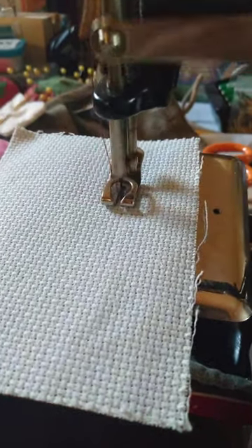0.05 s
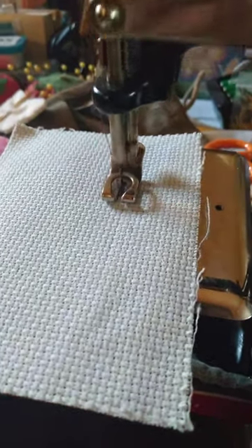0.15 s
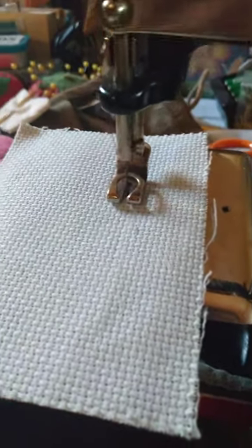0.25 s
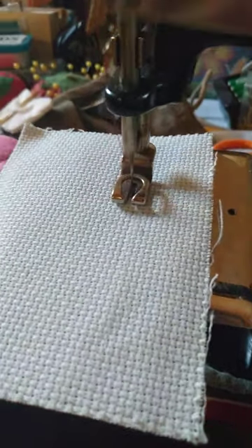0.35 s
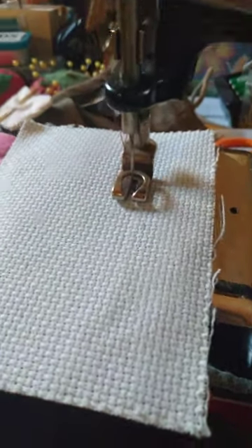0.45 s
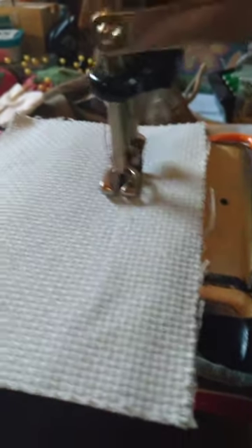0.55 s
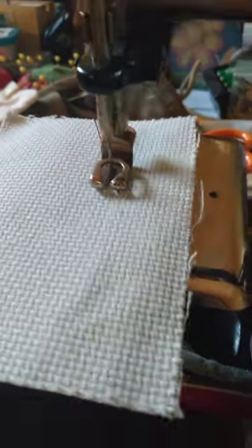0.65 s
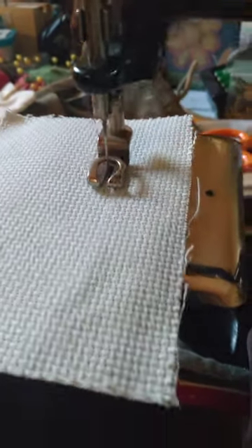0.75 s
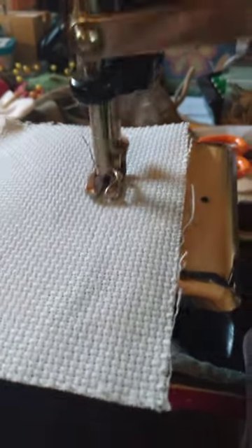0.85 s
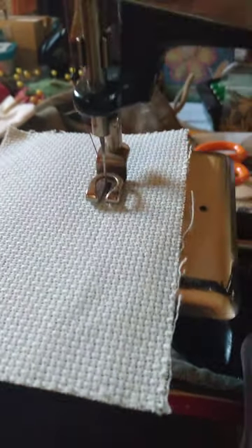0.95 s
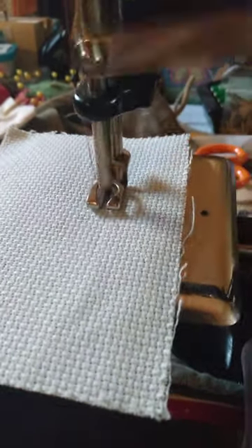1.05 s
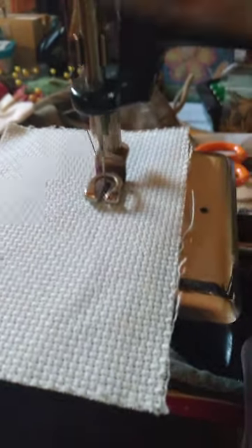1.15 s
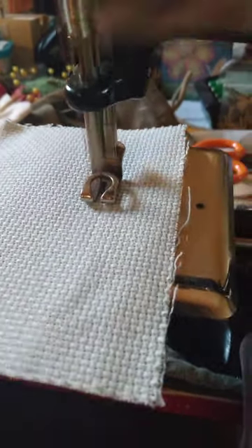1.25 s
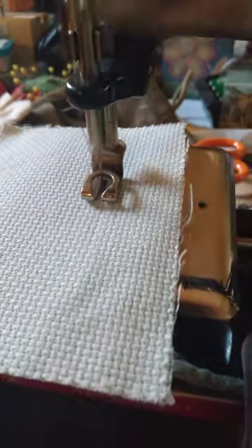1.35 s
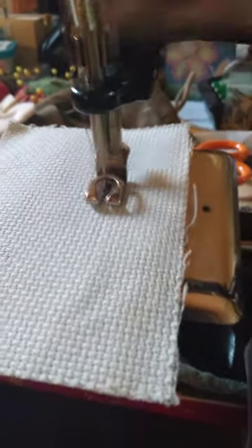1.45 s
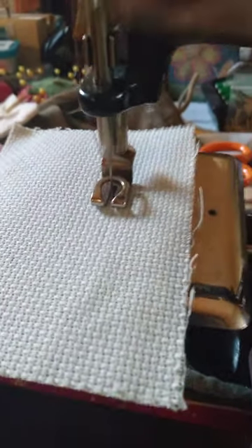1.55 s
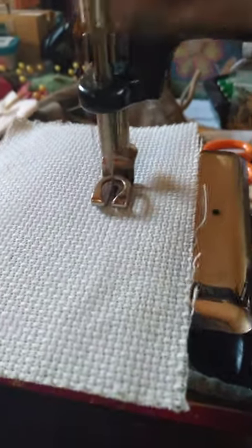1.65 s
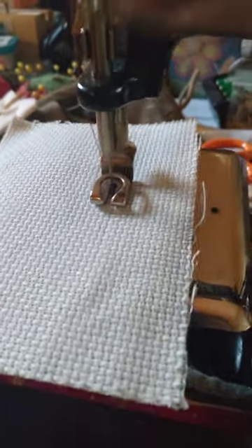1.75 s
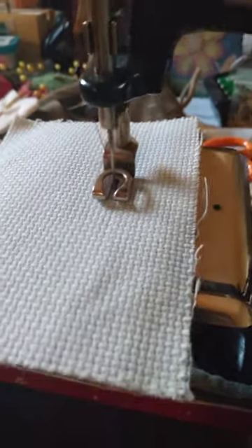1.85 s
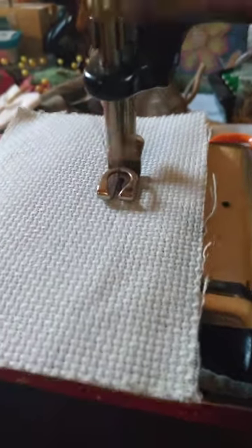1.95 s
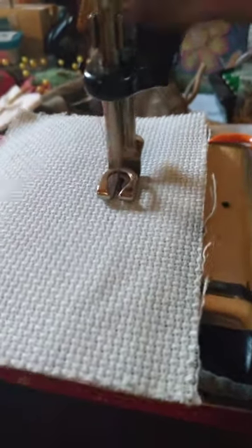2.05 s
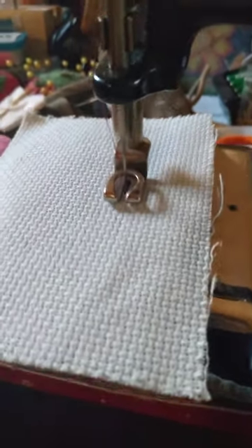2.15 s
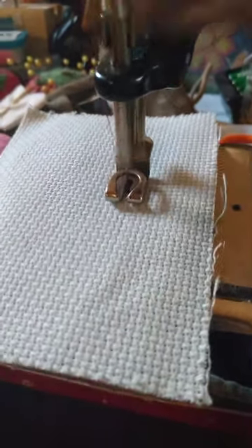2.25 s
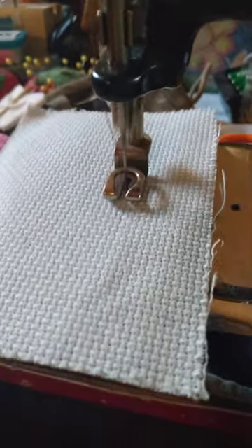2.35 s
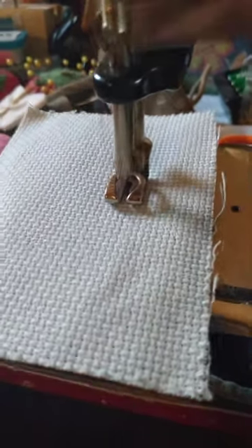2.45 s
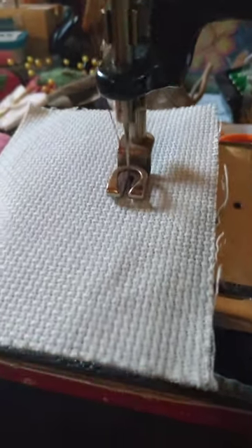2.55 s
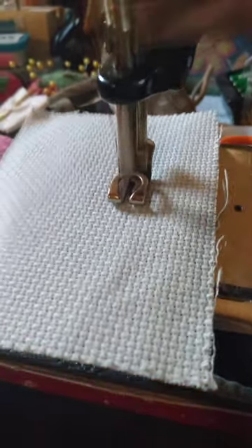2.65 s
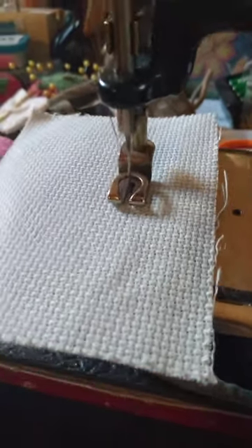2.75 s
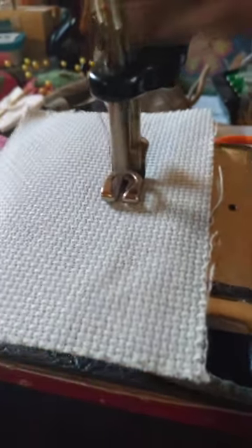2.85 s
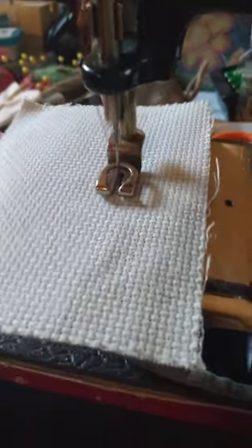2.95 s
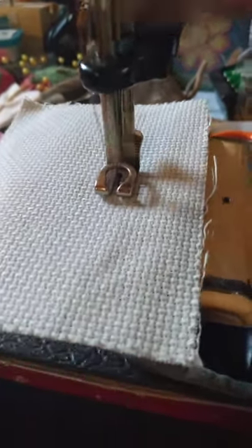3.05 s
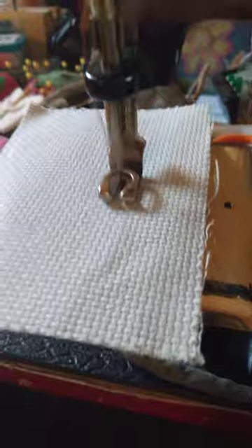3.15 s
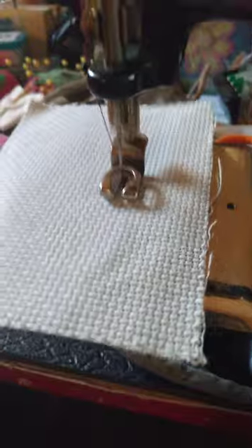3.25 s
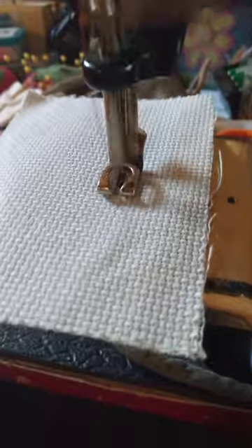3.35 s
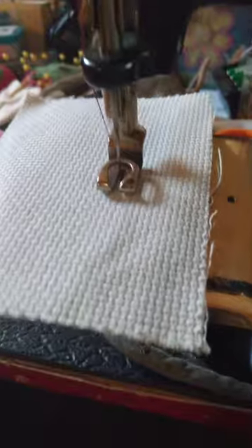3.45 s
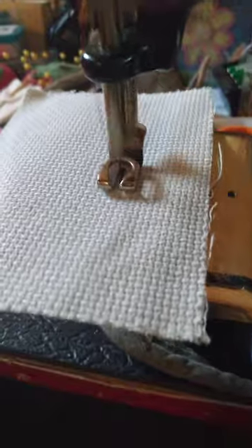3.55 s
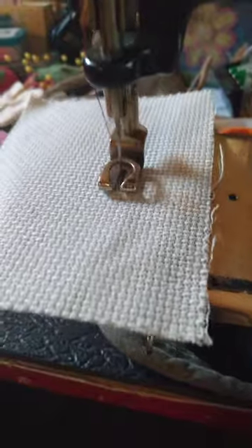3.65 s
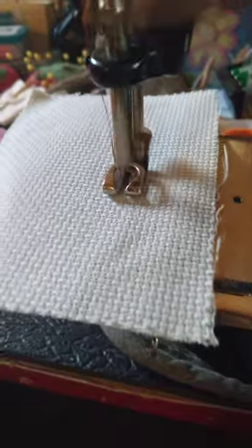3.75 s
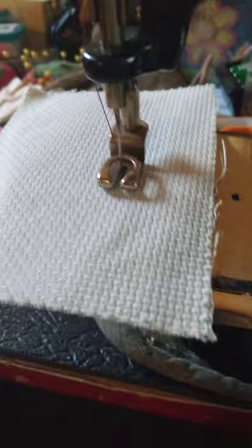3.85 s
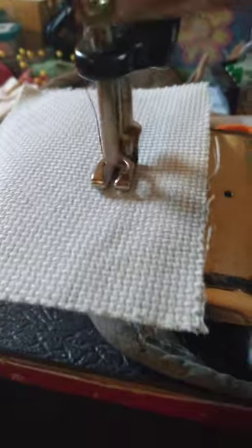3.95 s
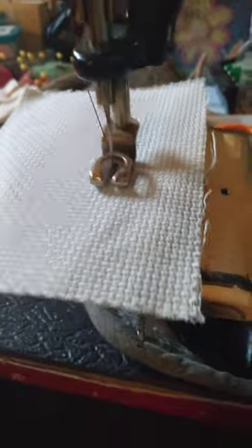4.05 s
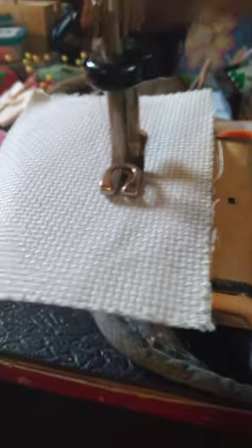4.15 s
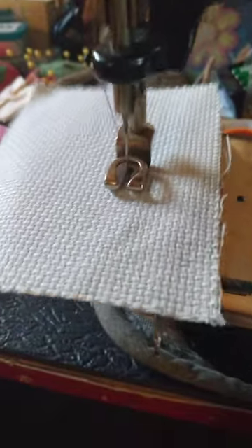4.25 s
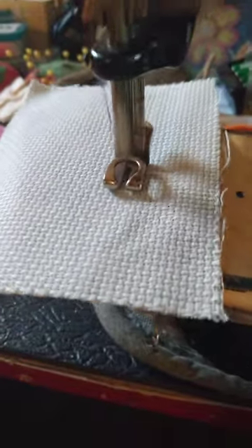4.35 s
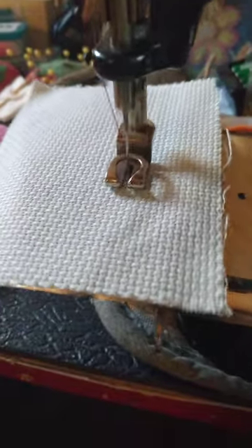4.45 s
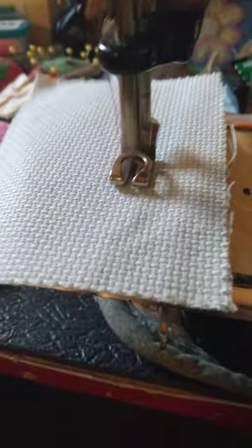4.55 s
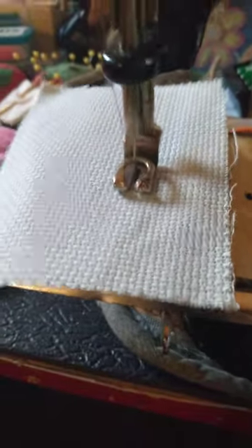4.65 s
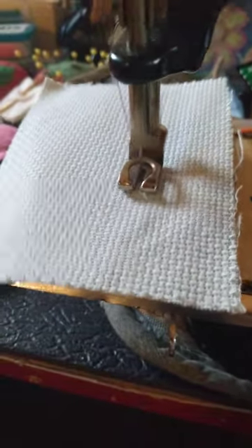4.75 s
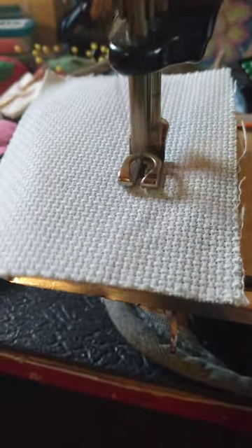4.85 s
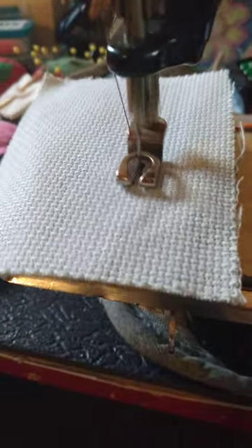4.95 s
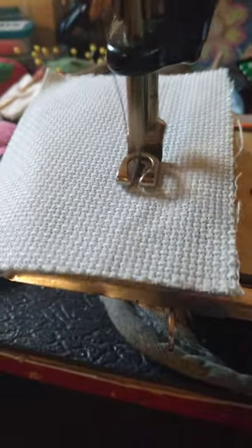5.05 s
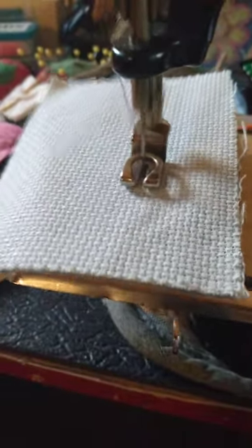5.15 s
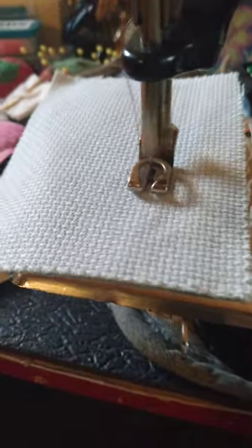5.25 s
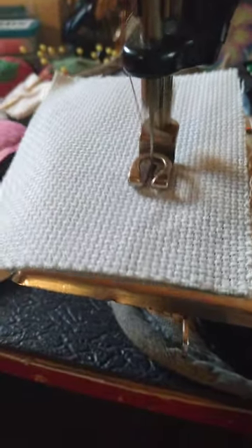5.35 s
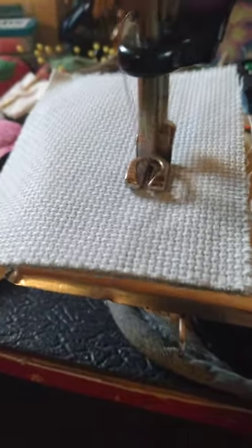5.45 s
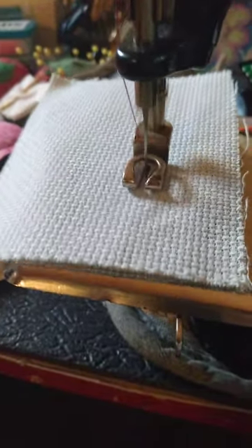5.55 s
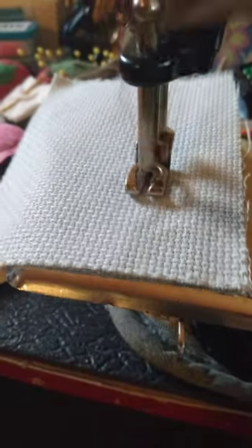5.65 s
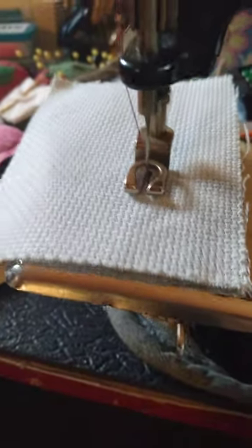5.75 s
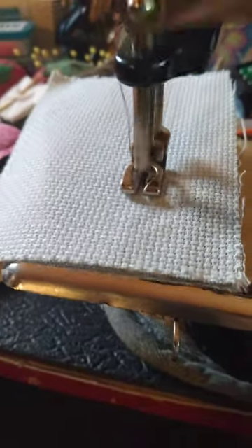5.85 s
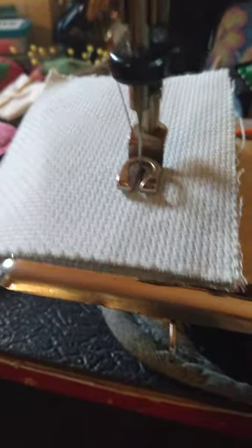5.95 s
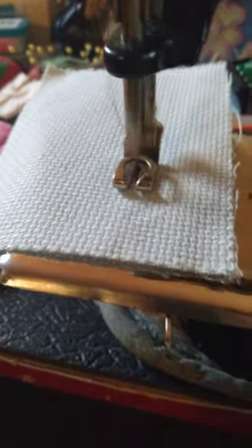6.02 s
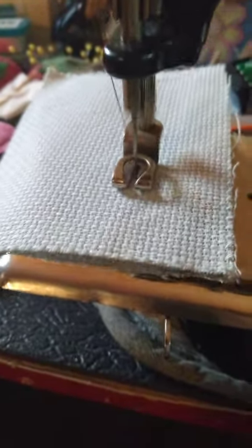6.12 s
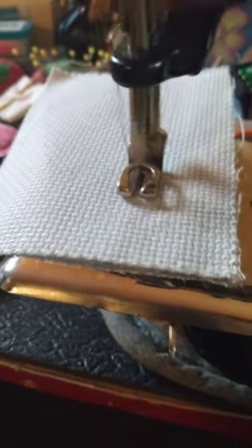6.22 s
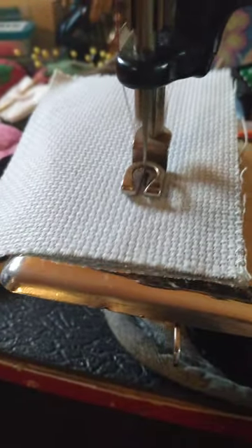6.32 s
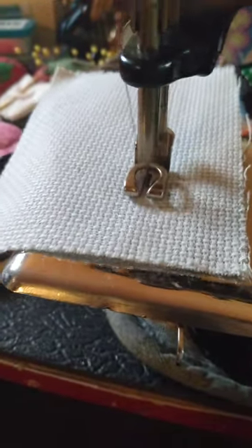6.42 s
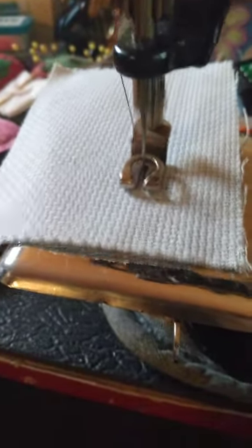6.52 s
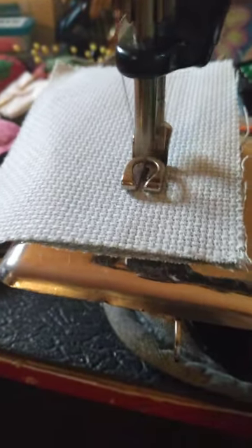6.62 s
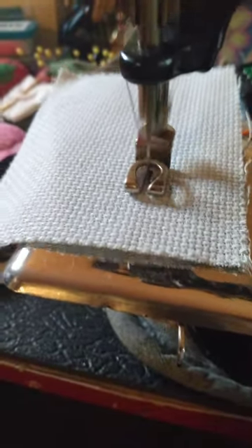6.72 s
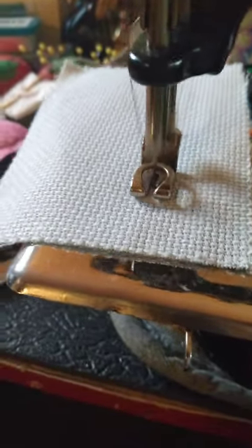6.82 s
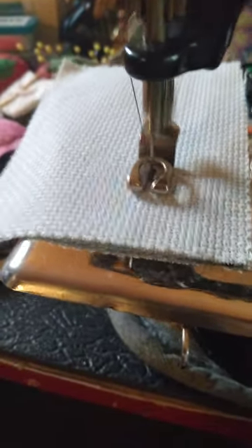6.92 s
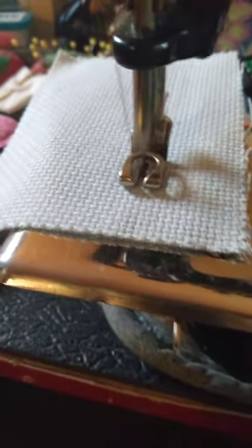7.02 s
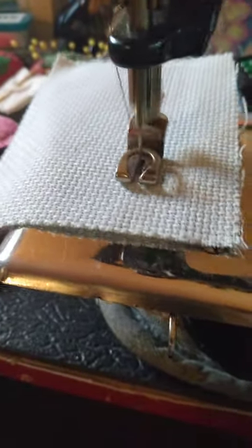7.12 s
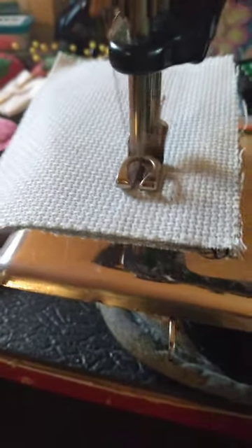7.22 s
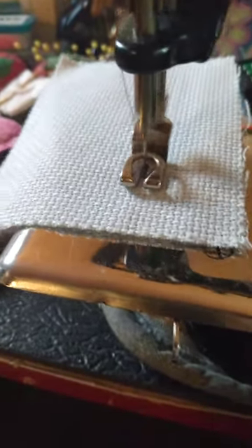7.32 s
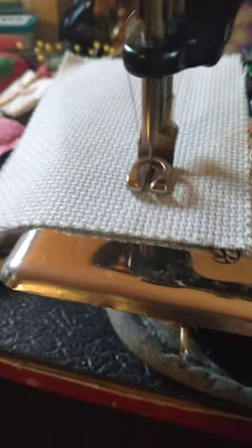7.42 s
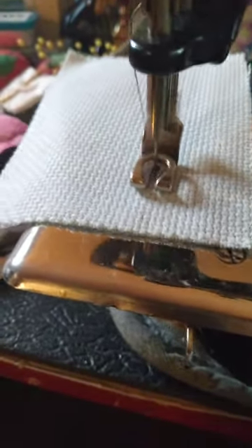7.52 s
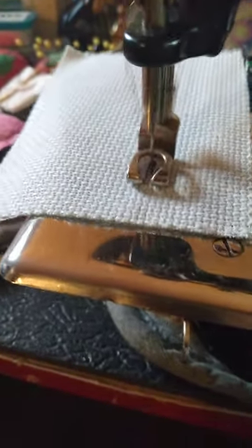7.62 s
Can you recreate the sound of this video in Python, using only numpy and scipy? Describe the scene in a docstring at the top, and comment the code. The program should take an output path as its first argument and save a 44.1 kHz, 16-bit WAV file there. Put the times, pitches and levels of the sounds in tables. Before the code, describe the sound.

Close, steady clicking and light rattling of an old cast-iron sewing machine, picking up speed after a hesitant start in a quiet room.

```python
"""At a sewing table, two microphone ports close to an old cast-iron machine, hand-cranked through
coarse cloth. The wheel starts haltingly, then settles to about five stitches a second. The shuttle
knocks at both ends of its swing, the needle bar clacks, thread and loose parts tick, and bed and
table thud. The sliding parts hiss, scrape and rumble in a pattern that repeats with each turn of
the shaft. The left port is nearer the needle; a quiet room lies behind."""
import sys
import numpy as np
from scipy import signal
from scipy.fft import rfft, irfft
from scipy.io import wavfile

SR = 44100
rng = np.random.default_rng(int(sys.argv[2]) if len(sys.argv) > 2 else 0)


def materialize(psi):
    """Save the field psi as 16-bit PCM at rate SR to the path in sys.argv[1].

    A 1-D psi becomes a single channel; in a 2-D psi each row is a channel.
    """
    bounded = np.clip(np.atleast_2d(psi).T, -1, 1)
    quanta = np.round(bounded * 32767).astype(np.int16)
    wavfile.write(sys.argv[1], SR, quanta)


N = 338688

# shuttle knocks at the front and at the back of its swing: t/s, level/dB
FRONT_KNOCKS = [(0.088, -37), (0.696, -26.5), (0.9856, -22.5), (1.202, -22), (1.4316, -22.5),
                (1.6354, -20.5), (1.8357, -22), (2.1404, -24), (2.3513, -23), (2.573, -23.5), (2.7693, -20),
                (2.966, -21.5), (3.157, -21), (3.3243, -20), (3.5124, -21), (3.7214, -21.5), (3.907, -21),
                (4.087, -21.5), (4.264, -18), (4.4616, -21), (4.66, -22.5), (4.8378, -21), (5.0233, -20.5),
                (5.2268, -20), (5.4202, -22), (5.6095, -22), (5.7938, -21.5), (5.9877, -21),
                (6.1895, -20.5), (6.3905, -23), (6.583, -22), (6.789, -21.5), (6.9933, -22), (7.187, -22),
                (7.3926, -23), (7.601, -22)]
BACK_KNOCKS = [(0.553, -29.5), (0.859, -30), (1.093, -28.5), (1.3092, -28), (1.537, -25.5), (1.7272, -25.5),
               (1.991, -48), (2.2427, -24), (2.4541, -25), (2.674, -26), (2.8596, -27), (3.058, -25),
               (3.2438, -20.5), (3.416, -25), (3.619, -28), (3.813, -26), (3.9954, -24.5), (4.1772, -24.5),
               (4.3603, -24.5), (4.5592, -26.5), (4.747, -23), (4.928, -24.5), (5.1265, -27.5),
               (5.315, -26.5), (5.5106, -24.5), (5.7017, -23), (5.8844, -25.5), (6.0833, -26),
               (6.28, -24.5), (6.4853, -26), (6.6825, -29.5), (6.888, -27), (7.082, -22.5), (7.2855, -24),
               (7.496, -26.5)]
# needle bar takes up its slack: t/s, level/dB
BAR_CLACKS = [(1.154, -39.5), (1.3781, -36.5), (1.5904, -31), (2.081, -43), (2.302, -35.5), (2.5147, -47),
              (2.7277, -23.5), (2.9207, -44), (3.111, -48), (3.288, -32.5), (3.4676, -31.5), (3.6756, -24),
              (3.862, -39), (4.224, -37.5), (4.415, -25), (4.6167, -30), (4.795, -36), (5.1817, -40),
              (5.3727, -30.5), (5.565, -26), (6.142, -40.5), (6.339, -41.5), (6.538, -41), (6.741, -31),
              (7.1382, -27.5), (7.342, -32.5), (7.5536, -35)]
# modes of shuttle and needle bar: f/Hz, left/dB, right/dB, t60/s (before contact damping)
SHUTTLE_MODES = [(1330, -30, -29, .012), (1690, -18, -28, .012), (2150, -21, -30, .008),
                 (2650, -24, -30, .008), (3600, -19, -20, .01), (3900, -16, -20, .008),
                 (4200, -5, -17, .011), (4525, -1, -19, .015), (6700, -20, -10, .006),
                 (7180, -7, -18, .012), (7720, 5, -15, .0045), (8300, -9, -11, .007),
                 (9100, -15, -12, .006), (10400, -11, -16, .008), (11100, -18, -20, .008),
                 (13420, -30, -36, .012), (15150, -15, -32, .006)]
BAR_MODES = [(2305, 0, -8, .015), (2910, -10, -24, .014), (4470, -16, -26, .014), (5530, -20, -18, .008),
             (7070, 12, -3, .014), (8000, 6, -14, .005), (9300, -4, -12, .005), (10250, 1, -6, .008),
             (11300, -6, -16, .006), (12500, -6, -20, .006), (13950, -4, -16, .02), (15000, -8, -19, .008)]
# thread take-up snaps tight: t/s, level/dB
THREAD_SNAPS = [(0.6135, -30.5), (0.9163, -29), (1.143, -25.5), (1.3662, -37), (1.581, -38),
                (1.7739, -24.5), (2.068, -26), (2.29, -37), (2.5032, -28), (2.716, -28), (2.9076, -27),
                (3.101, -30), (3.275, -25.5), (3.4562, -22), (3.6642, -25), (3.8533, -25), (4.034, -23),
                (4.217, -25.5), (4.4027, -29), (4.608, -29), (4.785, -23.5), (4.969, -26.5), (5.1708, -37),
                (5.363, -26), (5.551, -29), (5.741, -24), (5.929, -24), (6.135, -26.5), (6.3273, -28),
                (6.526, -24), (6.728, -31), (6.9351, -29.5), (7.1258, -27), (7.325, -27), (7.5408, -35)]
# needle pierces the cloth: t/s, level/dB
NEEDLE_PIERCES = [(1.0648, -36), (1.283, -47), (1.514, -24.5), (1.7035, -30), (2.2215, -29), (2.4308, -30),
                  (2.6516, -27), (2.8335, -36), (3.0353, -25), (3.2256, -30), (3.3932, -34), (3.5917, -46),
                  (3.7935, -29), (3.9764, -28.5), (4.158, -29), (4.335, -40), (4.5341, -29), (4.729, -24),
                  (4.9074, -26.5), (5.1003, -31), (5.2914, -30), (5.4894, -36), (5.6824, -24), (5.865, -28),
                  (6.0576, -30), (6.2598, -28), (6.4644, -27), (6.6577, -37), (6.8613, -42), (7.062, -32),
                  (7.2634, -35), (7.4718, -27)]
# louder ticks of loose parts: t/s, level/dB, f/Hz
LOOSE_TICKS = [(.1098, -38, 10500), (.0335, -52, 11000), (.1273, -41, 11300), (.1315, -38.5, 9000),
               (.1355, -42, 11500), (.1395, -47, 9500), (.2771, -47, 5040), (.281, -53, 4000),
               (4.3735, -46, 9000), (6.107, -40, 10500), (.628, -43, 9000), (.634, -39, 11000),
               (1.104, -35, 8500), (1.322, -48, 8000), (1.337, -35, 7800), (1.4829, -33, 8950),
               (1.576, -30, 9600), (1.587, -39, 9000), (2.1908, -33, 9400), (2.2476, -24.5, 10300),
               (2.8158, -32, 9500), (3.0164, -32, 10000), (3.2005, -33, 9500), (3.7752, -41, 10000),
               (4.714, -38, 10000), (5.2762, -30.5, 9900), (5.4748, -48, 10000), (5.6524, -44, 10000),
               (6.0984, -27, 10100), (6.4451, -45, 10000), (7.0457, -48, 9000), (7.09, -40, 8900),
               (7.164, -40, 13000), (.5145, -32.5, 11400), (.536, -33, 8200), (.934, -29.5, 7500),
               (1.5604, -26.5, 10900), (1.7412, -25.5, 10500), (2.0357, -36, 8950), (2.0795, -22, 9300),
               (2.087, -29, 8100), (2.2588, -13, 11200), (2.2663, -22, 10900), (2.2691, -26, 10800),
               (2.8848, -25, 10200), (3.136, -25.5, 10800), (3.143, -29, 11000), (3.111, -24.5, 9900),
               (3.2785, -23, 10900), (3.431, -28, 10000), (3.452, -39, 10500), (3.21, -25, 6860),
               (3.2553, -24, 7600), (3.262, -21, 10700), (3.259, -28, 8900), (7.309, -40, 9000),
               (3.4334, -20, 10200), (3.4432, -22, 10400), (4.0167, -29, 8000), (4.5856, -26, 9800),
               (4.6981, -29, 7260), (5.335, -25, 9300), (5.3956, -26, 9600), (5.5292, -22.5, 8200),
               (6.042, -37, 11600), (6.2204, -25, 5470), (6.505, -19.5, 8700), (6.836, -32, 8300),
               (6.9096, -30, 8700), (7.1028, -15.5, 7600), (7.2413, -26, 6500), (7.3045, -19, 9300),
               (7.3299, -24, 10600), (7.372, -32, 8500), (7.48, -28, 7700), (7.5176, -23, 7600)]
# bumps against the table: t/s, level/dB, f/Hz
TABLE_BUMPS = [(2.219, -49.5, 202), (2.245, -61, 110), (2.336, -45, 770), (7.37, -68, 140)]
# feed teeth drag the cloth: t/s, level/dB, f/Hz
FEED_SCRAPES = [(2.7444, -20, 3140), (3.477, -20, 3160), (4.423, -18, 3140), (5.3844, -20, 3100),
                (6.3444, -23, 2970)]

# effort on the crank, heard as the level of the sliding parts: t/s, level/dB
CRANK_EFFORT = [(0, -110), (.08, -90.5), (.125, -70), (.16, -80), (.26, -94), (.29, -81), (.43, -99.5),
                (.5, -64), (.68, -63.5), (.8, -72), (.9, -66), (.97, -59.5), (1.38, -60), (1.55, -57.5),
                (1.9, -59), (2.03, -71.5), (2.14, -59), (2.49, -57.5), (2.7, -57.5), (3.27, -56),
                (3.79, -56), (4.1, -55.5), (5.0, -56.5), (5.55, -55.5), (6.11, -58.5), (6.6, -56.5),
                (6.9, -57), (7.4, -54.5), (7.68, -56.5)]
# friction over one turn of the shaft, from the front knock: phase/turn, hiss/dB, scrape/dB, rumble/dB
TURN_PATTERN = [(0, -3, -0.5, 7), (.07, 9.5, 2.5, 5.5), (.1, 3.5, 0.5, 3.5), (.2, 6, 1.5, 0),
                (.25, 13, 3, 6), (.36, 12.5, 2.5, 0.5), (.5, 11, 8.5, 6.5), (.6, 7.5, -3, 2.5),
                (.66, -1.5, -4, -3), (.7, 21.5, -23, 9), (.76, 3.5, 5.5, 8), (.82, 10.5, -5, -1),
                (0.901, 5.5, 0, 6.5), (.96, 4.5, -13, 0.5)]
# Each _TONE is a spectrum: f/Hz, level/dB. Each _PEAKS lists resonances: f/Hz, width/Hz, lift/dB.
# needle bar and thread sliding
HISS_TONE = [(200, -31), (600, -16), (3500, -10.5), (5500, -7.5), (7570, 2), (9500, -1.5), (11000, -3),
             (13500, -2), (16000, -10.5)]
HISS_PEAKS = [(7070, 50, 10), (9050, 150, 3), (11200, 1800, 4), (10400, 120, 6), (14000, 90, 4)]
# shuttle and feed teeth scraping
SCRAPE_TONE = [(200, -54), (600, -33), (1200, -22), (1800, -5), (2800, -8.5), (4300, 7.5), (5200, -17),
               (7000, -41)]
SCRAPE_PEAKS = [(2317, 128, 18), (2900, 32, 4), (3174, 280, 7.7), (3540, 900, 4.9), (4205, 43, 1.3),
                (4720, 110, 7.3)]
# cast-iron bed and table
RUMBLE_TONE = [(50, -62), (120, -55), (230, -27.5), (360, -15.5), (500, -1.5), (1000, -9), (1800, -5.5),
               (2600, -20)]
RUMBLE_PEAKS = [(362, 16, 3), (471.2, 21, 8.7), (514.1, 14.5, 7.2), (637, 30, 8), (849.3, 77, 9.2),
                (950, 51, 7.3), (1351, 50, 9.2), (1657, 33, 4.8)]
# low rub while the wheel barely moves: t/s, level/dB
RUB_LEVEL = [(0, -81), (.1, -100), (.2, -78), (.35, -71), (.5, -71), (.62, -76), (.75, -110)]
RUB_TONE = [(250, -51), (400, -13), (480, 0.5), (620, -7), (800, -19), (1500, -49)]
# needle bar humming at first: t/s, level/dB
HUM_LEVEL = [(0, -68.5), (.08, -70.5), (.27, -84), (.35, -110)]
HUM_TONE = [(500, -22), (1500, -15), (2500, -6), (5500, -18), (7500, 2), (12000, -16), (16000, -11)]
HUM_PEAKS = [(2110, 40, 19), (3060, 70, 18), (4510, 60, 18), (7080, 120, 20), (11000, 500, 8),
             (14000, 70, 18)]
# shuttle creeping before the wheel gets going: t/s, level/dB
CREEP_LEVEL = [(.24, -100), (.28, -73), (.33, -77), (.4, -72.5), (.48, -74), (.56, -95)]
CREEP_TONE = [(1200, -8.5), (2200, 2), (3000, -3), (3800, 11), (4500, 7), (5200, -28), (9000, -55),
              (16000, -28)]
# lean of the sliding parts toward the left port, applied in part: f/Hz, level/dB
LEFT_LEAN = [(200, -23), (400, -2.5), (700, 9), (1300, 7), (2400, 10), (4400, 9.5), (7500, 7.5), (9000, 12),
             (11000, 4.5), (12500, 16), (15000, 5)]
# the quiet room
ROOM_TONE = [(18, -42), (38, -20), (60, 0), (100, -10), (200, -18), (450, -19), (700, -30), (5700, -36),
             (7100, -29), (8500, -36), (16000, -40)]

# right port's delay in samples: it is farther from the needle; frame and bed reach both almost at once
NEEDLE_LAG, FRAME_LAG, BED_LAG = 20, 4, 3
FULL_EFFORT_DB = -53


def shuttle():
    """The shuttle strikes both ends of its swing: hard and bright in front, duller at the back."""
    front = blows(FRONT_KNOCKS, SHUTTLE_MODES, rise_s=.00013, spread_db=2, tilt_db=-1.5, late_db=-8.5,
                  crack_db=-6, crack_s=.0004, crack_right_db=-1, tail_db=-46, tail_s=.01)
    back = blows(BACK_KNOCKS, SHUTTLE_MODES, rise_s=.00025, spread_db=2, tilt_db=-12, late_db=-30,
                 crack_db=-16, crack_s=.0007, crack_right_db=-13, tail_db=-23, tail_s=.013)
    return front + back


def needle_bar():
    """The bar takes up its slack, first touching 0.4 ms ahead of each clack, and rattles on."""
    touches = [(s - .0004, db) for s, db in BAR_CLACKS]
    return blows(touches, BAR_MODES, rise_s=.0004, spread_db=2.5, tilt_db=0, late_db=-24,
                 crack_db=3, crack_s=.0012, crack_right_db=-8, tail_db=-23.5, tail_s=.06)


def thread_take_up(hz=10600, rebound_s=.0022):
    """Tick rows: the thread snaps tight after a faint lead tick, and the spring rattles three times."""
    rows = []
    for s, db in THREAD_SNAPS:
        luck = rng.standard_normal(9)
        for k in (1, 2, 3):
            delay_s = rebound_s * (k + .25 * luck[2 + k])
            rows.append((s + delay_s, db - 7 - 2 * k + 3 * luck[5 + k], hz))
        rows.append((s, db, hz * (1 + .016 * luck[0])))   # the snap itself
        rows.append((s - .0029, db - 25 + 3 * luck[1], hz))
    return rows


def shuttle_bounces(bounce_s=.0075, hz=7300):
    """Tick rows: the shuttle bounces once after each front knock."""
    rows = []
    for s, db in FRONT_KNOCKS:
        when, size = rng.standard_normal(2)
        rows.append((s + bounce_s * (1 + .3 * when), db - 13 + 2.5 * size, hz))
    return rows


def faint_ticks(hz=8600):
    """Tick rows: once a turn a loose part ticks faintly, mostly just after the back knock."""
    rows = []
    for (start, _), (end, _) in zip(FRONT_KNOCKS[1:], FRONT_KNOCKS[2:]):
        when, size, pitch = rng.standard_normal(3)
        phase = (.57 + .05 * when) % 1
        s = start + phase * (end - start)
        rows.append((s, -35 + .19 * effort_db(s) + 3 * size, hz * (1 + .12 * pitch)))
    return rows


def small_parts(decay_s=.0007, width=1.35):
    """Each small contact (t/s, level/dB, f/Hz) is a bright snap with a weaker broad click below."""
    pierces = [(s, db, 12700) for s, db in NEEDLE_PIERCES]
    rows = list(LOOSE_TICKS) + pierces + thread_take_up() + shuttle_bounces() + faint_ticks()
    out, t = np.zeros((2, N)), np.arange(700) / SR
    for s, db, hz in rows:
        burst = np.sqrt(2) * rng.standard_normal(len(t)) * np.exp(-t / decay_s)
        burst[:4] += amp(10) * np.hanning(4)   # the hard first contact
        snap = butter(burst, 1, [hz / width, min(hz * width, 19000)], "band")
        click = amp(-16.5) * butter(burst, 1, [1200, 6000], "band")
        add(out, s, amp(db) * (snap + click) * ports(right_db=-7.5), NEEDLE_LAG)
    out[1] = butter(out[1], 2, 12500, "low")   # the right port is turned away from these parts
    return out


def bed_thuds():
    """Clacks, snaps and front knocks pass dull blows into the bed; the table booms after a clack."""
    rows = [(s, db - 23, 460) for s, db in BAR_CLACKS]
    for hits, delay_s, db, hz in ((THREAD_SNAPS, .00343, -54.5, 556), (FRONT_KNOCKS, .0066, -52, 472)):
        rows += [(s + delay_s, db + .95 * effort_db(s), hz) for s, _ in hits]
    thuds = bursts(rows, rise_s=.0015, decay_s=.02, width=1.11, right_db=-6.5, lag=BED_LAG)
    boom_rows = [(s, db - 38, 375) for s, db in BAR_CLACKS]
    booms = bursts(boom_rows, rise_s=.0035, decay_s=.12, width=1.4, right_db=5, lag=BED_LAG)
    return butter(thuds + booms, 3, 260, "high")   # the table top is too small for deep bass


def table_bumps():
    """A few bumps against the table, low and quickly damped."""
    return bursts(TABLE_BUMPS, rise_s=.0005, decay_s=.016, width=2, right_db=0, lag=BED_LAG)


def feed_teeth():
    """The feed teeth drag the cloth in short, narrow-band scrapes."""
    return bursts(FEED_SCRAPES, rise_s=.048, decay_s=.0073, width=1.08, right_db=-12, lag=NEEDLE_LAG)


def sliding_parts():
    """Bar and thread hiss, shuttle and teeth scrape, the bed rumbles, following shaft and effort."""
    turn, effort = shaft_phase(), effort_db(np.arange(N) / SR)
    phases, *patterns = np.transpose(TURN_PATTERN)
    hiss_db, scrape_db, rumble_db = (np.interp(turn, phases, db, period=1) for db in patterns)
    hiss = friction(hiss_db + effort - 53.5, HISS_TONE, HISS_PEAKS,
                    grains_per_s=220, grain_db=13, shared=.15, flutter_db=3, flutter_hz=38)
    scrape = friction(scrape_db + .91 * effort - 55.5, SCRAPE_TONE, SCRAPE_PEAKS,
                      grains_per_s=88, grain_db=14, shared=.01, flutter_db=3, flutter_hz=60)
    rumble = friction(rumble_db + .99 * effort - 56.5, RUMBLE_TONE, RUMBLE_PEAKS,
                      grains_per_s=80, grain_db=9, shared=.36, flutter_db=2.5, flutter_hz=13.7,
                      lag=BED_LAG)
    return hiss + scrape + rumble


def slow_start():
    """While the wheel barely moves there is a soft low rub, the bar hums and the shuttle creeps."""
    t = np.arange(N) / SR
    rub = friction(at_time(RUB_LEVEL, t), RUB_TONE, (),
                   grains_per_s=78, grain_db=-3, shared=1, flutter_db=2.5, flutter_hz=12, lag=BED_LAG)
    hum = friction(at_time(HUM_LEVEL, t), HUM_TONE, HUM_PEAKS,
                   grains_per_s=30, grain_db=-5, shared=.4, flutter_db=1.5, flutter_hz=15)
    creep = friction(at_time(CREEP_LEVEL, t), CREEP_TONE, (),
                     grains_per_s=90, grain_db=5, shared=.25, flutter_db=2, flutter_hz=30)
    return rub + hum + creep


def room_tone():
    """The quiet room: steady low noise, separate at each port."""
    noise = np.array([colour(rng.standard_normal(N), ROOM_TONE) for side in "LR"])
    return amp(-87) * unit_rms(noise)


def blows(hits, modes, rise_s, spread_db, tilt_db, late_db,
          crack_db, crack_s, crack_right_db, tail_db, tail_s):
    """A blow rings all modes, with a crack and a dying rattle; its hardness tilts the treble."""
    out, t = np.zeros((2, N)), np.arange(3000) / SR
    hz, left_db, right_db, t60 = np.transpose(modes)
    treble_octaves = np.log2(hz / 4400).clip(0)
    gains = amp(np.array([left_db, right_db]) + tilt_db * treble_octaves)
    gains *= (-1) ** np.arange(len(hz))   # neighbouring modes start in opposite directions
    t60 = np.minimum(t60, .017)[:, None]   # the part is damped while it presses on its stop
    envelope = amp(-60 * t / t60) + amp(late_db - 20 * t / t60)   # a faint ring lasts three times longer
    envelope *= (1 - np.exp(-t / rise_s)) ** 2   # the contact builds up smoothly
    crack = amp(crack_db) * ports(crack_right_db) * np.exp(-t / crack_s)
    tail = amp(tail_db) * ports(right_db=-7) * np.exp(-t / tail_s)
    for s, db in hits:
        detune = 1 + .003 * rng.standard_normal((len(hz), 1))
        rings = envelope * np.sin(2 * np.pi * hz[:, None] * detune * t)
        ringing = (gains * amp(spread_db * rng.standard_normal(len(hz)))) @ rings
        rattle = butter(rng.standard_normal((2, len(t))) * (crack + tail), 2, [3000, 14500], "band")
        add(out, s, amp(db) * (ringing + rattle), FRAME_LAG)
    return out


def bursts(rows, rise_s, decay_s, width, right_db, lag):
    """One noise burst a row (t/s, level/dB, f/Hz), in a band from f / width to f * width."""
    out, t = np.zeros((2, N)), np.arange(4000) / SR
    envelope = (1 - np.exp(-t / rise_s)) * np.exp(-t / decay_s)
    for s, db, hz in rows:
        noise = unit_rms(butter(rng.standard_normal(len(t)), 2, [hz / width, hz * width], "band"))
        add(out, s, amp(db) * noise * envelope * ports(right_db), lag)
    return out


def friction(level_db, tone, peaks, grains_per_s, grain_db, shared, flutter_db, flutter_hz,
             lag=NEEDLE_LAG):
    """Rubbing surfaces send noise and tiny catches through the body; the ports share part of it."""
    catches = amp(grain_db + 3.5 * np.minimum(rng.exponential(1, N), 3)) * rng.choice([-1, 1], N)
    near = rng.standard_normal(N) + catches * (rng.random(N) < grains_per_s / SR)
    gain = amp(level_db + flutter_db * drift(flutter_hz))
    far = np.sqrt(shared) * near + np.sqrt(1 - shared) * rng.standard_normal(N) * near.std()
    left = colour(gain * near, tone, peaks, lean=.04)
    right = colour(np.pad(gain * far, (lag, 0))[:N], tone, peaks, lean=-.7)
    return np.array([left, right]) / np.std(colour(near, tone, peaks))


def far_port(x, scatter_db, scatter_s):
    """The right port also hears knocks by way of cloth and table: a short smear of reflections."""
    t = np.arange(600) / SR
    path = amp(scatter_db) * rng.standard_normal(len(t)) * np.exp(-t / scatter_s)
    path[0] = 1
    return np.array([x[0], signal.fftconvolve(x[1], path / np.linalg.norm(path))[:N]])


def shaft_phase():
    """Share of the current turn: 0 at the front knock, a little under half at the back knock."""
    front, back = np.array(FRONT_KNOCKS)[:, 0], np.array(BACK_KNOCKS)[:, 0]
    times = np.concatenate([front, back, [front[-1] + .22]])
    turns = np.concatenate([np.arange(len(front)), np.arange(len(back)) + .465, [len(front)]])
    order = np.argsort(turns)
    return np.interp(np.arange(N) / SR, times[order], turns[order]) % 1


def effort_db(s):
    """Effort on the crank at time s, relative to full effort."""
    return at_time(CRANK_EFFORT, s) - FULL_EFFORT_DB


def colour(x, tone, peaks=(), lean=0):
    """Minimum-phase filter from a spectrum, its resonances and a share of the leftward lean."""
    hz = np.fft.rfftfreq(8192, 1 / SR) + 1
    level_db = at_hz(tone, hz) + lean * at_hz(LEFT_LEAN, hz)
    level_db += sum(lift_db / (1 + (2 * (hz - f) / width) ** 2) for f, width, lift_db in peaks)
    cepstrum = irfft(np.log(amp(level_db)))
    cepstrum[1:4096] *= 2   # folding onto positive time makes the filter causal
    cepstrum[4097:] = 0
    impulse = irfft(np.exp(rfft(cepstrum)))
    return signal.fftconvolve(x, impulse)[:N]


def drift(hz):
    """Random wander of rms 1, mostly slower than hz."""
    pole = np.exp(-2 * np.pi * hz / SR)
    wander = signal.lfilter([1], [1, -2 * pole, pole * pole], rng.standard_normal(N + SR))
    return unit_rms(wander[SR:])


def add(out, s, sound, lag):
    """Mix a stereo sound in at time s; it reaches the right port lag samples later."""
    for side, start in enumerate((round(s * SR), round(s * SR) + lag)):
        piece = sound[side][:N - start]
        out[side, start:start + len(piece)] += piece


def ports(right_db):
    """Left and right gains, the left at unity."""
    return amp([[0], [right_db]])


def butter(x, order, hz, kind):
    """Butterworth filter."""
    return signal.sosfilt(signal.butter(order, hz, kind, fs=SR, output="sos"), x)


def at_time(curve, s):
    """Read a level curve at time s."""
    return np.interp(s, *np.transpose(curve))


def at_hz(tone, hz):
    """Read a spectrum on a log-frequency axis."""
    points_hz, level_db = np.transpose(tone)
    return np.interp(np.log(hz), np.log(points_hz), level_db)


def amp(db):
    """dB to gain."""
    return 10 ** (np.asarray(db) / 20)


def unit_rms(x):
    """Scale to rms 1."""
    return x / np.sqrt(np.mean(x ** 2))


def scene():
    """The machine close up at both ports, the room behind it."""
    knocks = far_port(shuttle() + needle_bar() + small_parts(), scatter_db=-15, scatter_s=.0005)
    knocks = butter(knocks, 4, 380, "high")   # small hard parts radiate no bass
    machine = knocks + bed_thuds() + table_bumps() + feed_teeth() + sliding_parts() + slow_start()
    return machine + room_tone()


def record(dry):
    """The deepest bass and the highest treble are rolled off; nothing sounds above 16.9 kHz."""
    low_cut = butter(dry, 2, 45, "high")
    rolled = butter(low_cut, 6, 15900, "low")
    return signal.sosfilt(signal.cheby2(12, 60, 16900, fs=SR, output="sos"), rolled)


dry = scene()
out = record(dry)
materialize(out)
```